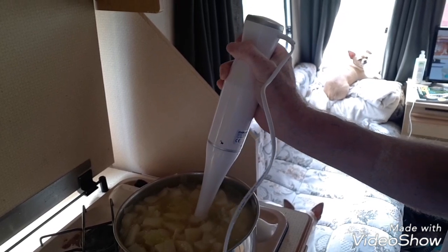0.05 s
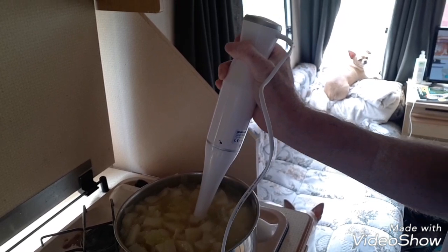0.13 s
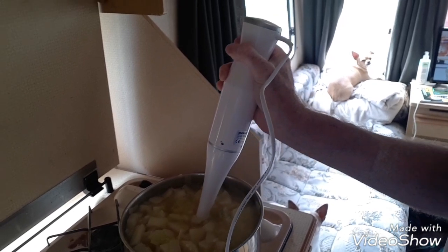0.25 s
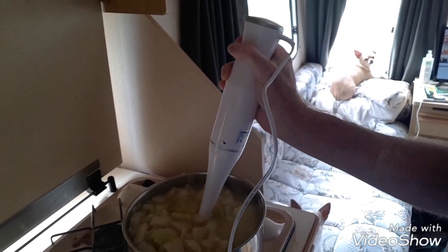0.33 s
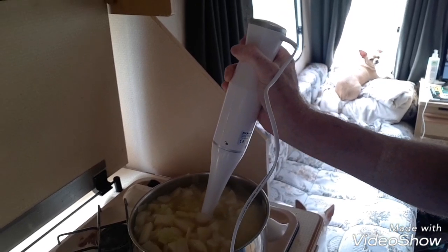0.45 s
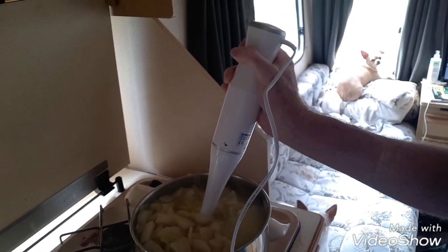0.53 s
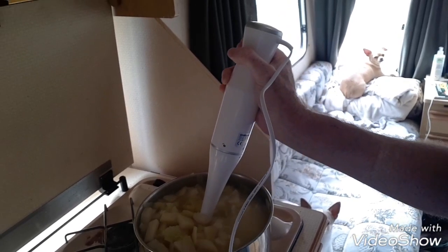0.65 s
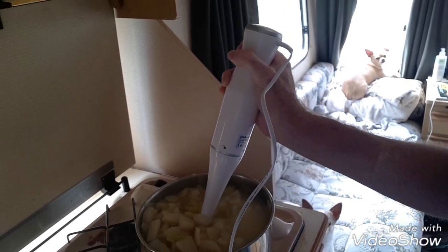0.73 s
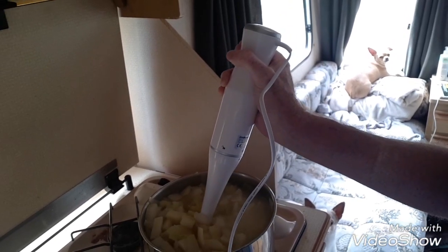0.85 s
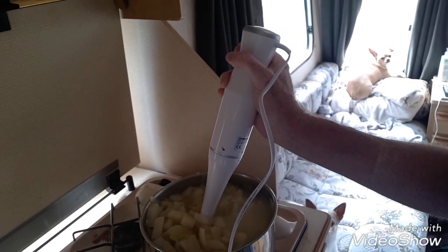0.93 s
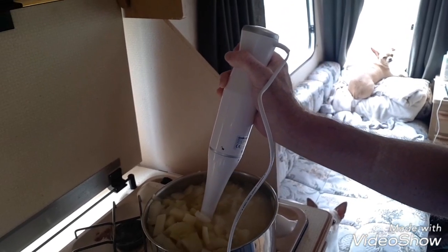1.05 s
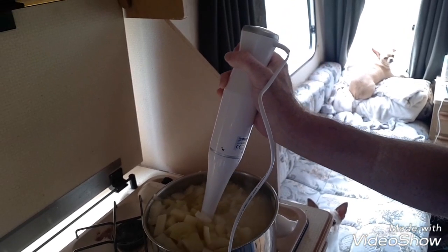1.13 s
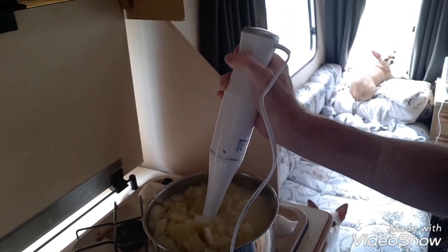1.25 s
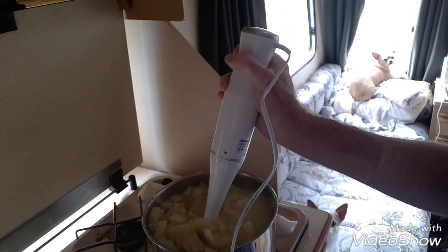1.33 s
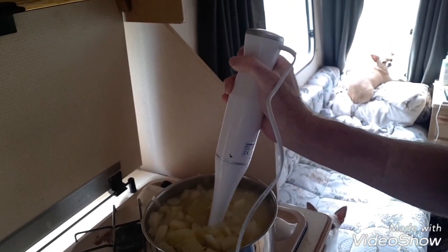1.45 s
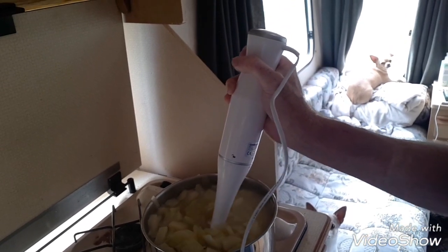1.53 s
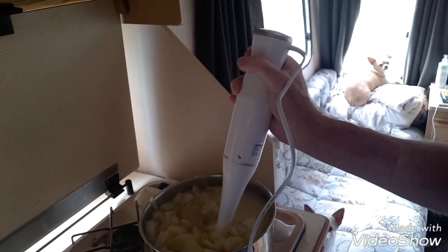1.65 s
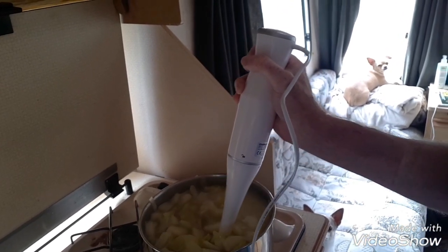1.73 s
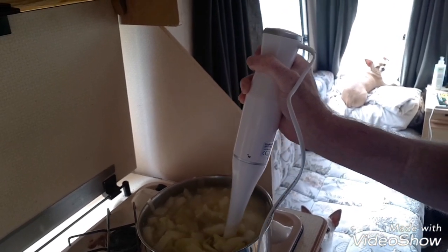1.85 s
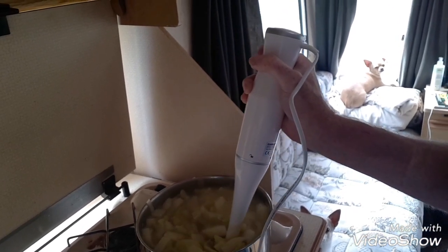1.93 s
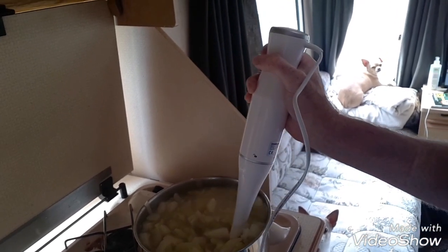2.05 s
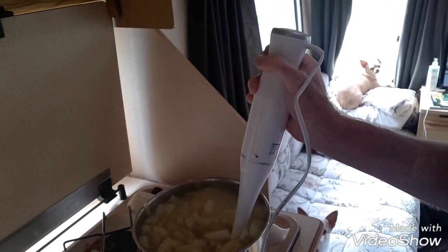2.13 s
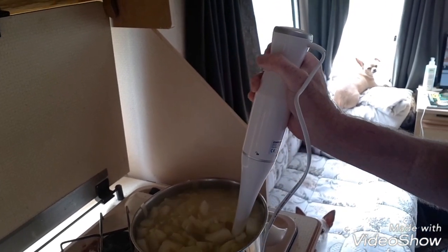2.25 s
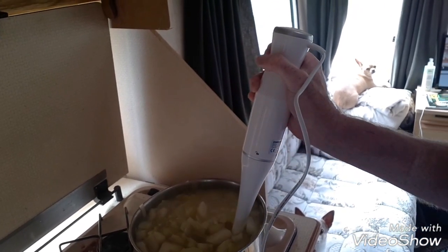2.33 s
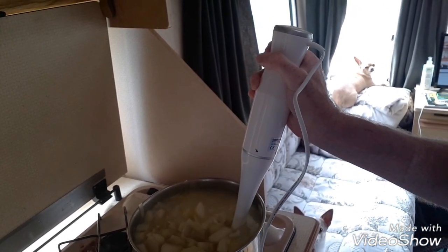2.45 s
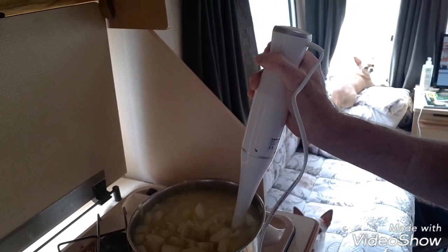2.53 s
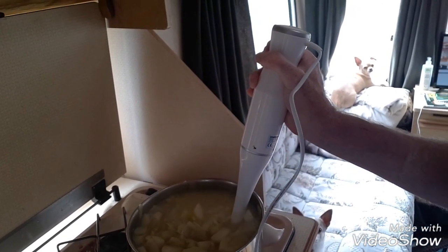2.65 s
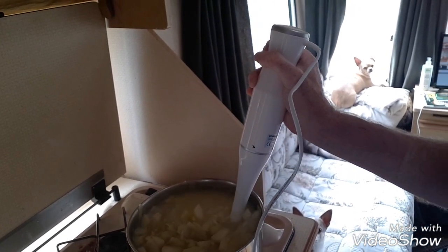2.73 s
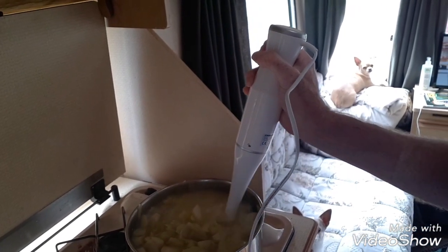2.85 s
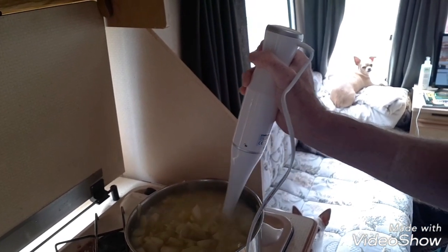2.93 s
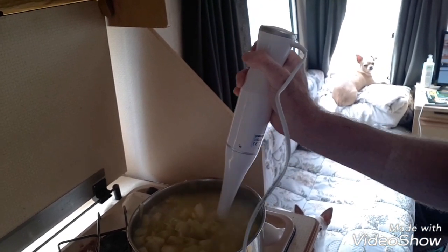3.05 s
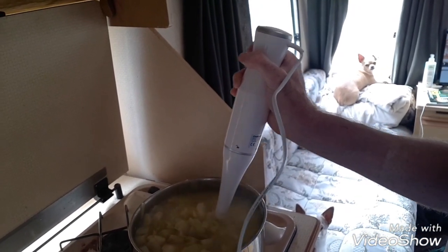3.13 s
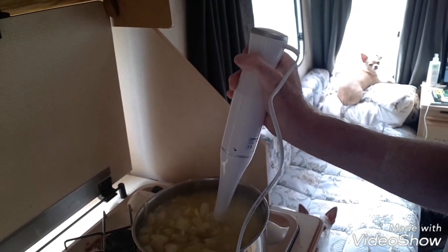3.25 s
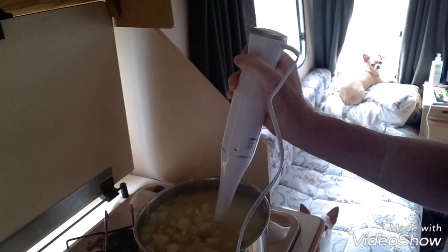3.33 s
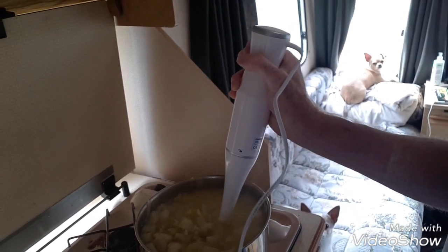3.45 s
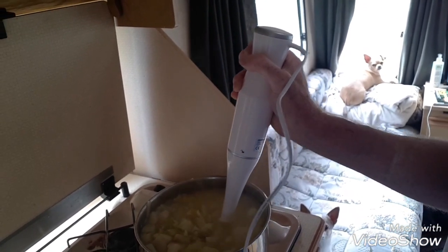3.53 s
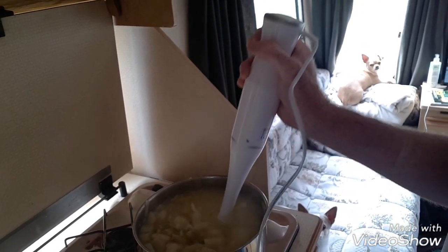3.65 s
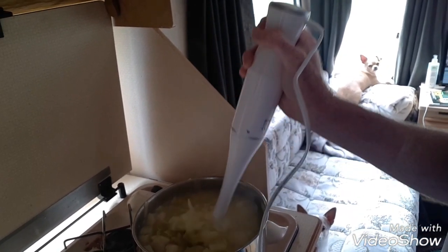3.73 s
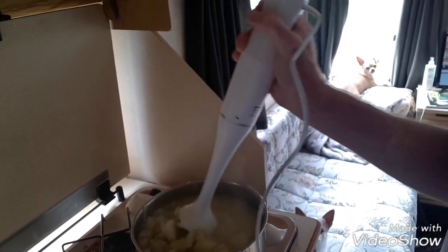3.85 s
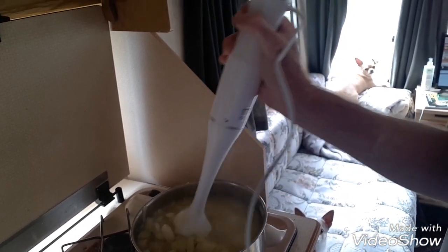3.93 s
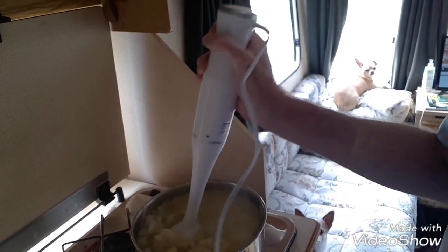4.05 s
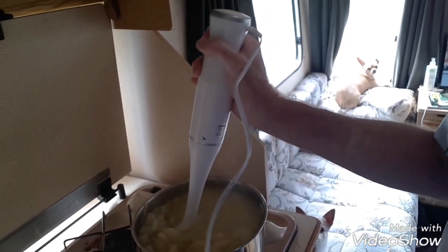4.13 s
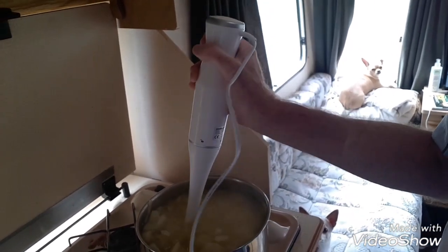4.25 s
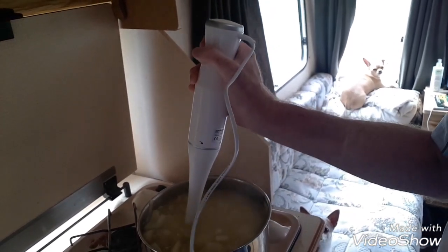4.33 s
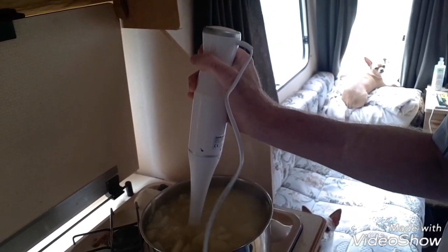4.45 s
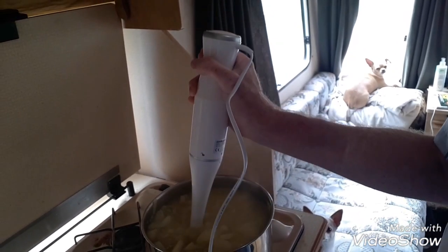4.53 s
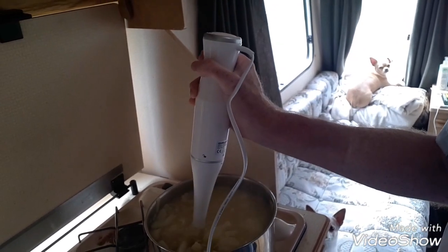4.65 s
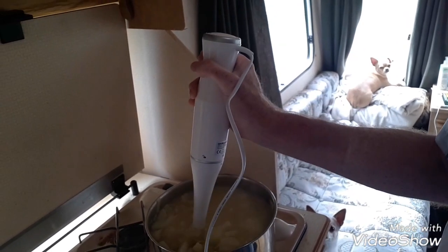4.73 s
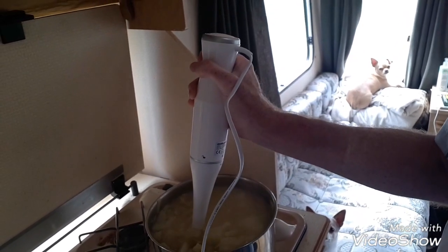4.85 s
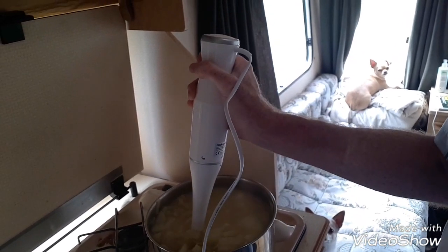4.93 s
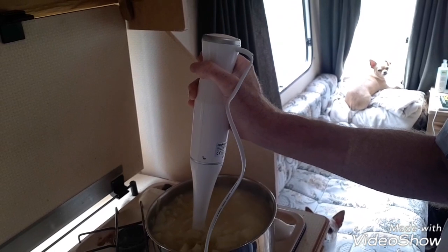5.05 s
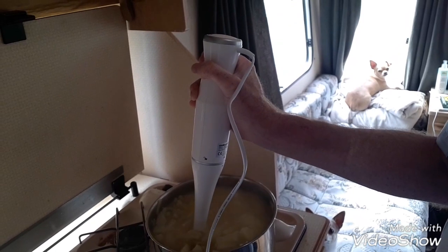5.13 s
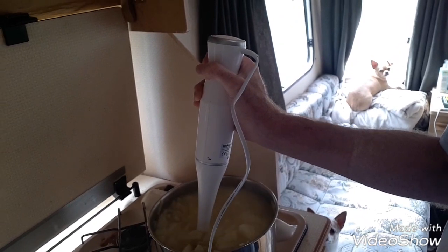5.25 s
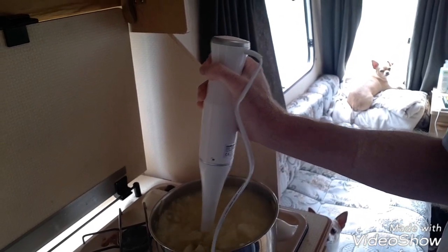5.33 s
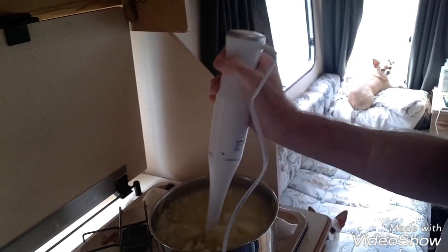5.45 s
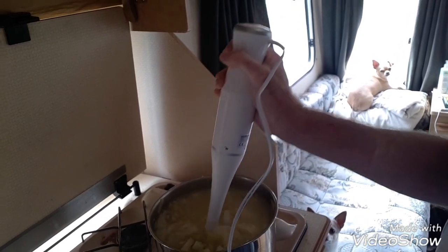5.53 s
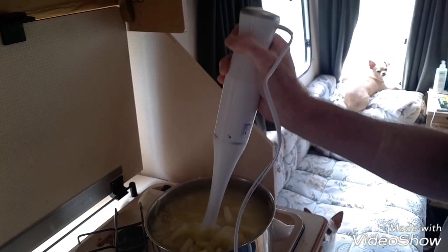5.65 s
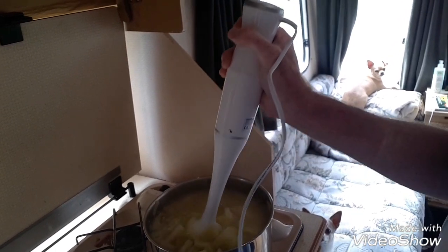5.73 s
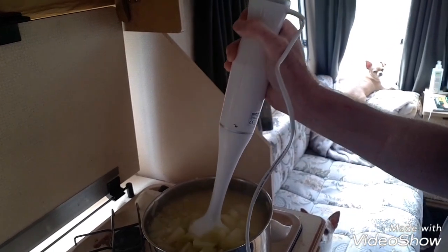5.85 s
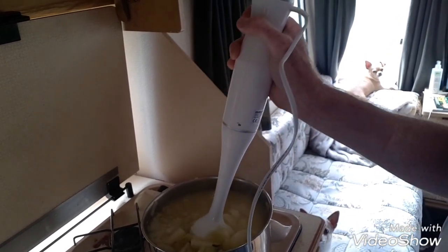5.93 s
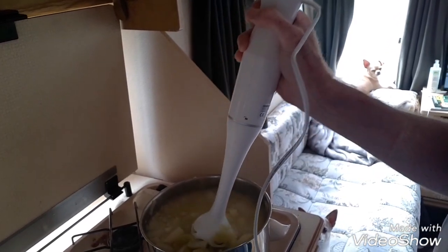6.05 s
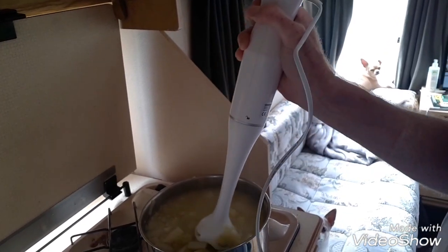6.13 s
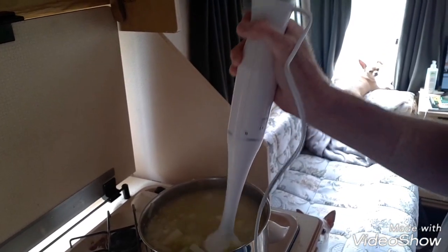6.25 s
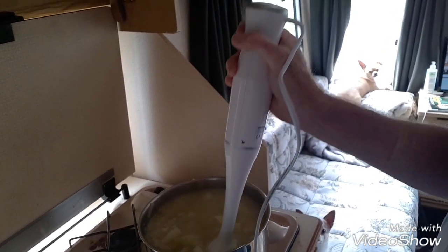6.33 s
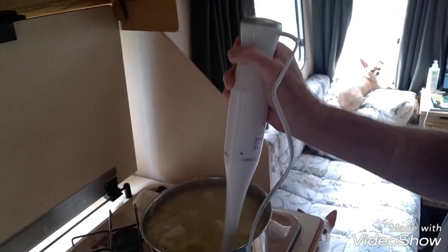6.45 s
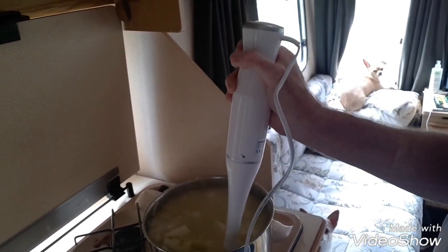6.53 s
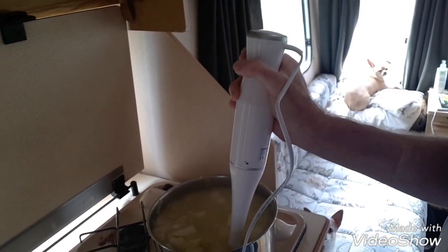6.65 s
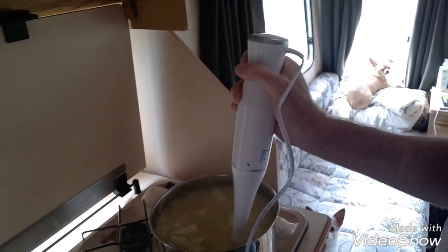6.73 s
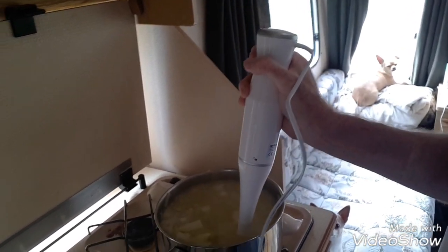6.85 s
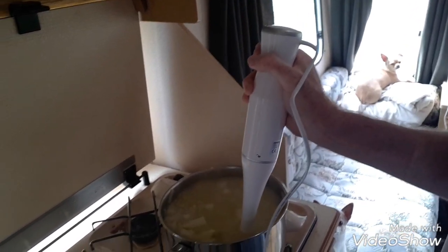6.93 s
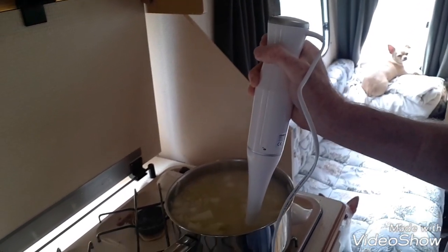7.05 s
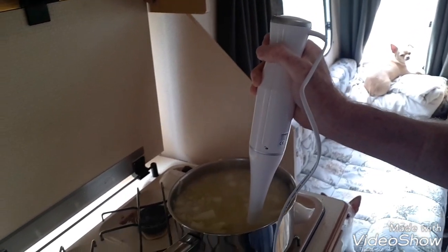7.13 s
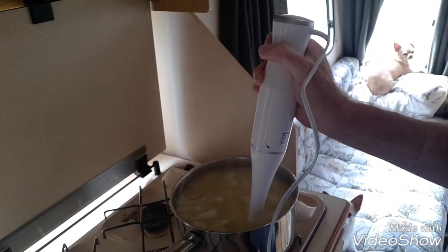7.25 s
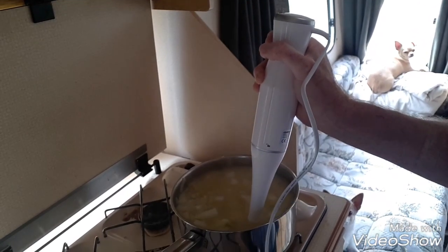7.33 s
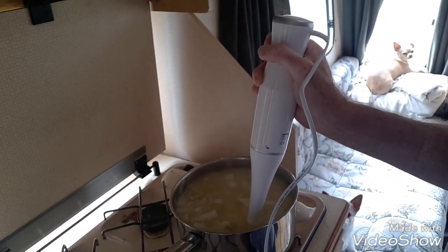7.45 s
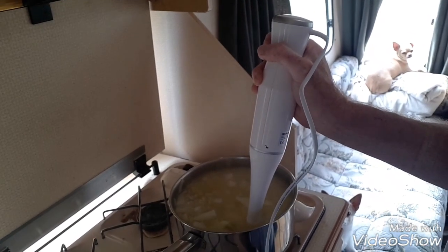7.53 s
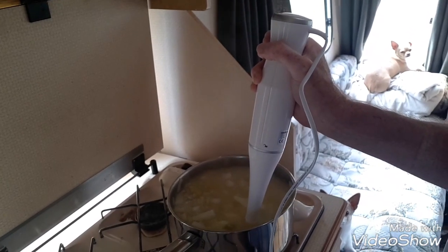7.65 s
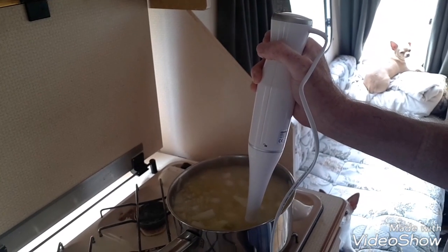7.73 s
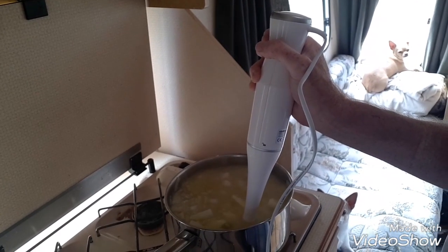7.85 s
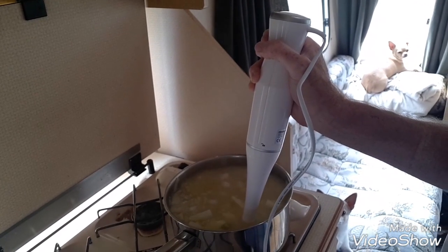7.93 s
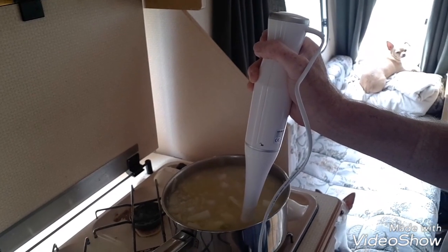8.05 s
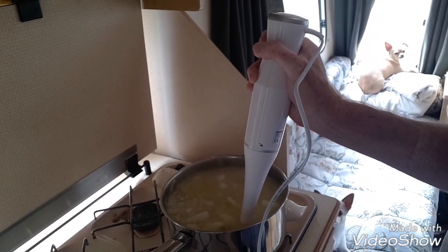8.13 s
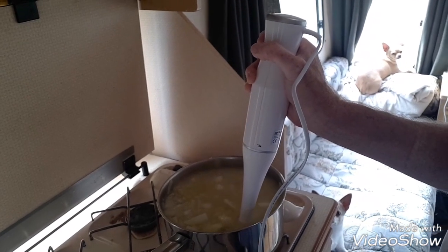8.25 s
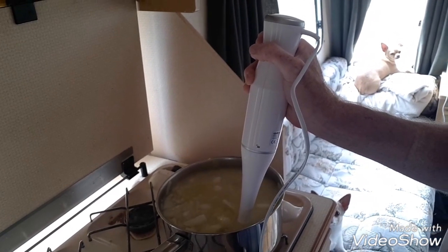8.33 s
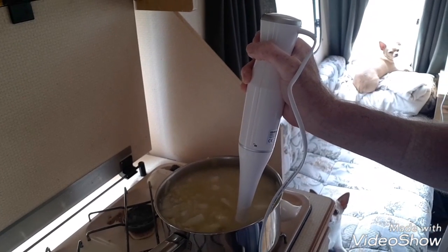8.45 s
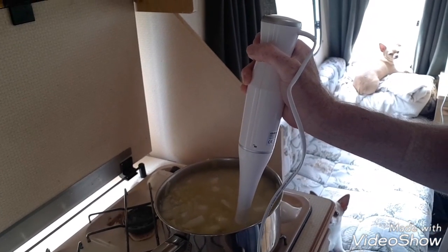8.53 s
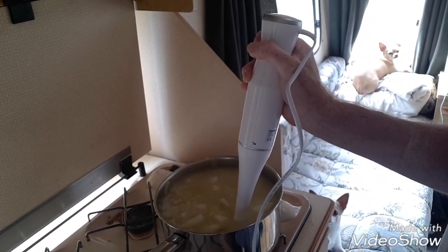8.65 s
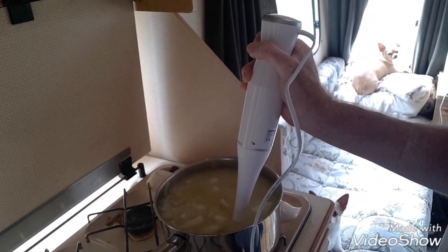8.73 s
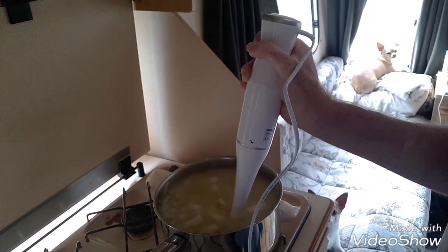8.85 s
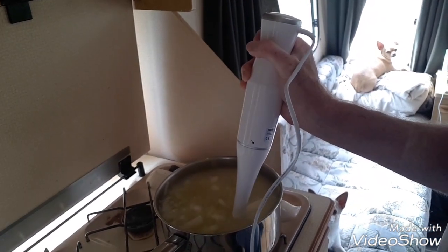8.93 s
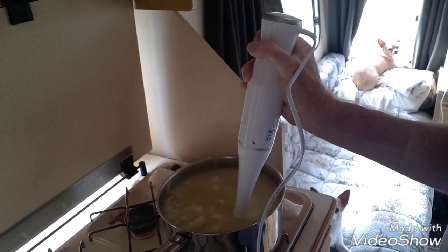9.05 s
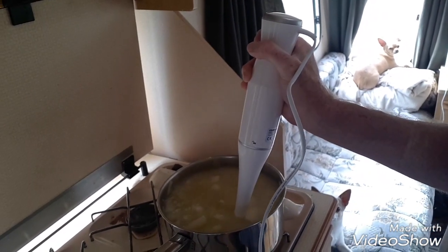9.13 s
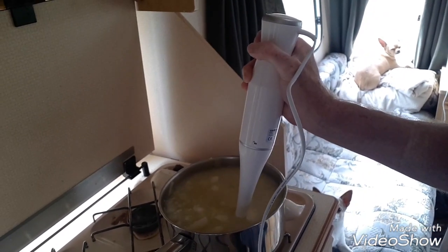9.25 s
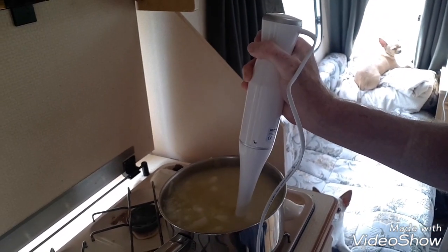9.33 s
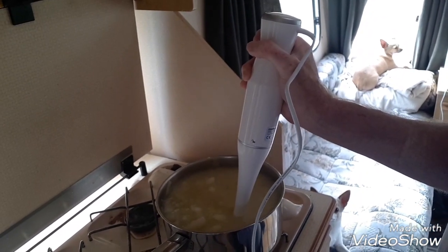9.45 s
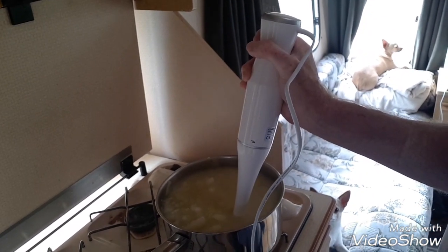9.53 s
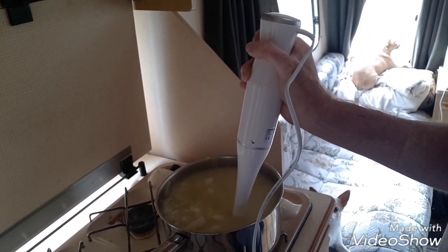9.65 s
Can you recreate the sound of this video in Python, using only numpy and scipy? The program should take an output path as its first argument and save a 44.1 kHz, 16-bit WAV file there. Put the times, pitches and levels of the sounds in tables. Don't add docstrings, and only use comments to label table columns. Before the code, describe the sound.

A hand blender purees soup in a steel pan in pulses and long runs, humming, whining and sloshing, with a faint dog whimper in one pause.

```python
import sys
import numpy as np
from scipy import signal
from scipy.fft import rfft, irfft, next_fast_len
from scipy.io import wavfile

SR = 44100
rng = np.random.default_rng(int(sys.argv[2]) if len(sys.argv) > 2 else 0)


def master(y):
    cut = np.clip(np.atleast_2d(y).T, -1, 1)
    pcm = np.round(cut * 32767)
    wavfile.write(sys.argv[1], SR, pcm.astype(np.int16))


def field_ratio(decibels):
    return 10 ** (np.asarray(decibels, dtype=float) / 20)


N = 427329
TIME = np.arange(N) / SR
COARSE = TIME[::50]
PADDED = next_fast_len(N)
FREQ = np.arange(PADDED // 2 + 1) * SR / PADDED + 1e-3
MAINS_RIPPLE_HZ = 100


def rms_one(x):
    return x / np.sqrt(np.mean(x ** 2) + 1e-20)


def in_time(rows):
    s, *columns = np.transpose(rows)
    return [np.interp(TIME, s, c) for c in columns]


def at_hz(points):
    hz, values = np.transpose(points)
    return np.interp(np.log(FREQ), np.log(hz), values)


def modes(rows):
    return np.sqrt(sum(field_ratio(db) ** 2 / (1 + (2 * (FREQ - hz) / width) ** 2) ** 2 for hz, width, db in rows))


def drift(rate):
    r = np.exp(-80 * np.pi * rate / SR)
    slow = signal.lfilter([1], [1, -2 * r, r * r], rng.standard_normal(N // 40 + 2002))[2000:]
    return np.interp(np.arange(N) / 40, np.arange(len(slow)), rms_one(slow))


# pitch_hz, likeness (-1 to 1)
LIKENESS = [(30, 0), (100, 0.72), (330, .85), (700, 0.43), (1500, 0.34), (3000, -.1)]


def noise(gain, band_hz=(20, 20000), grain_db=0.):
    lumps = field_ratio(grain_db * drift(60.))
    mid, side = rfft(rng.standard_normal((2, N)) * lumps, PADDED) * gain
    alike = np.clip(at_hz(LIKENESS), -1, 1)
    pair = np.sqrt(1 + alike) * mid + np.sqrt(1 - alike) * side * [[1], [-1]]
    inside = (FREQ > band_hz[0]) & (FREQ < band_hz[1])
    return rms_one(irfft(pair, PADDED)[:, :N]) * np.sqrt(np.sum(gain ** 2) / np.sum(gain[inside] ** 2))


def walls(x, t60, wet_db):
    t = np.arange(int(.2 * SR)) / SR
    tail = rng.standard_normal((2, len(t))) * field_ratio(-60 * t / t60) * (t > .002)
    tail = field_ratio(wet_db) * tail / np.sqrt(np.sum(tail ** 2, axis=1, keepdims=True))
    return (x + signal.fftconvolve(x[None], tail, axes=1)[:, :N]) / np.sqrt(1 + field_ratio(wet_db) ** 2)


# pitch_hz, level_db (per Hz)
ROOM = [(20, -30), (50, -13), (95, -2), (200, -13), (370, -17.5), (950, -19.5), (1150, -23.5), (5600, -38),
        (7800, -27), (9400, -48.5), (15000, -52.5)]


def room_air():
    return field_ratio(-68.5) * noise(field_ratio(at_hz(ROOM)))


# start_s, pitch_hz, level_db
WHIMPER = [
    (3.84, 2400, -100),
    (3.87, 2360, -90),
    (3.95, 2260, -80.5),
    (4.07, 2130, -75),
    (4.11, 2170, -100),
]


def dog():
    hz, db = in_time(WHIMPER)
    tone = field_ratio(db) * (db > -99) * np.sin(2 * np.pi * np.cumsum(hz) / SR)
    return walls(tone, t60=.2, wet_db=-10.5)


def burst(at_s, peak_db, t60, source):
    since = np.arange(int(.25 * SR)) / SR
    start = round(at_s * SR)
    return start, field_ratio(peak_db - 6 - 60 * since / t60) * source[:, start:start + len(since)]


# start_s, level_db (peak), pitch_hz, decay_s
TOUCHES = [(0.656, -44, 1090, .03), (3.1, -36.5, 1500, .04), (3.9, -69.5, 3100, 0.033),
           (3.955, -49, 2900, 0.16), (4.135, -63, 3800, 0.038), (4.228, -52.5, 1500, 0.33),
           (4.294, -44, 1000, 0.043), (6.098, -65, 500, 0.066), (6.305, -44, 800, 0.1),
           (6.33, -47, 450, 0.38), (6.435, -40, 1007, 0.039)]


def touches():
    out = np.zeros((2, N))
    white = rng.standard_normal((2, N))
    for s, db, hz, t60 in TOUCHES:
        start, x = burst(s, db + 12.5, t60, white)
        band = signal.butter(1, [0.67 * hz, 1.0 * hz], "band", fs=SR)
        out[:, start:start + x.shape[1]] += signal.lfilter(*band, x)
    return out


# start_s, level_db (peak), thud_db (gain of the thud against the crack)
LUMPS = [(0.1326, -24.5, -6), (0.2124, -24.5, -8), (0.2698, -24, -10), (1.8088, -31, 1), (3.4994, -62, 19),
         (5.2994, -44, 8), (5.3694, -52, -3.5), (7.8744, -33, 8), (7.9174, -35, 0), (8.1644, -38.5, -10),
         (9.3794, -30, 3)]


def lumps_on_blade():
    out = np.zeros((2, N))
    crack = noise(modes([(3470, 2800, 0.83), (7900, 2000, -2.8)]))
    thud = noise(modes([(700, 1000, 0)]))
    for s, db, thud_db in LUMPS:
        start, x = burst(s, db + 4.5, 0.15, crack + field_ratio(thud_db) * thud)
        out[:, start:start + x.shape[1]] += x
    return out


# start_s (switched on), still_s (all at rest)
RUNS = [
    (-1, .656),
    (.657, 3.79),
    (4.293, 5.66),
    (6.434, 10),
]


def running():
    gates = [np.clip(np.minimum((TIME - on) / .003, (still - TIME) / .1), 0, 1) for on, still in RUNS]
    return np.max(gates, axis=0)


# start_s (pressed), release_s
PRESSES = [
    (-1, -.16),
    (.06, .3),
    (.657, .868),
    (1.036, 2.905),
    (3.076, 3.435),
    (4.294, 5.265),
    (6.435, 11),
]


def follow(start_db, rise_s, run_on_s, fall_db):
    each = []
    for on, off in PRESSES:
        swell = start_db * np.exp(-np.maximum(COARSE - on, 0) / rise_s) - 90 * (COARSE < on)
        each.append(swell - fall_db * np.maximum(COARSE - off - run_on_s, 0))
    return np.interp(TIME, COARSE, np.max(each, axis=0))


# start_s, turns_hz
LOADED = [(.8, 197), (1.2, 201), (1.68, 204), (1.8, 194.5), (1.92, 200), (2.28, 201.5), (2.5, 197),
          (2.9, 194.5), (3.35, 198), (4.4, 185), (4.56, 184), (4.68, 196), (5.22, 200.5), (6.6, 195),
          (7.77, 204), (8.81, 202), (9.2, 195.5), (9.69, 201.5)]


def rotation():
    spin_up_s, coast_s = .026, .18
    share, left = 0, 1
    for (on, off), (again, _) in zip(PRESSES, PRESSES[1:] + [(12, 12)]):
        reached = 1 - (1 - left) * np.exp(-np.clip(COARSE - on, 0, off - on) / spin_up_s)
        share = np.where(COARSE >= on, reached * np.exp(-np.maximum(COARSE - off, 0) / coast_s), share)
        left = np.exp(-(again - off) / coast_s)
    return np.interp(TIME, COARSE, share) * in_time(LOADED)[0]


def ripple(depth):
    turn = 2 * np.pi * MAINS_RIPPLE_HZ * TIME
    return 1 + depth * (np.cos(turn) + .7 * np.cos(2 * turn + 1.2) + .45 * np.cos(3 * turn + 2.2))


# start_s, swirl_db (soup), pressed_db (blade guard on the pan),
# froth_db, leaning_db (shaft)
HAND = [(.14, 0, -12, 8, 0), (.33, -3, -8, -1, 2), (.8, -3, 3, 0, -6), (1.37, -3, -1, 0, -3),
        (1.82, 3, 0, -1, 4), (2.15, 0, -1, 0, 6), (2.3, 3, 0, 0, 3), (2.88, 2, 3, 2, -4),
        (3.3, 1, 3, -2.5, -4), (4.31, -2, -12, 0, -5), (4.38, 1, 10, 2, -4), (4.65, 0, 1, 0, -6),
        (5.25, 0, -2, 0, 3), (6.6, -1, -1, -1, -5), (7.15, -5, -11, -2, 6), (7.6, -3, 1, -2, 7),
        (8.3, 0, -1, -1.5, 3), (9.69, 1, 0, -2, 5)]
# pitch_hz, width_hz, level_db
SLOSH = [(279.6, 51, -0.5), (349.5, 72, 3), (178, 53, -10)]


def slosh():
    swirl_db, _, _, leaning_db = in_time(HAND)
    slosh_db = -33 + swirl_db + 0.9 * drift(6.) + follow(-25, .028, .075, 155)
    rumble_db = slosh_db - 18 + 0.6 * leaning_db + 2.6 * drift(5.)
    rumble = field_ratio(rumble_db) * noise(modes([(101.8, 31, 0)]))
    return rumble + field_ratio(slosh_db) * noise(modes(SLOSH), (220, 370), grain_db=2.0)


# pitch_hz, level_db (per Hz)
CHURN = [(300, -23.5), (450, 2), (650, -1.5), (900, 3.5), (1050, -2), (1600, -1), (2000, -5), (2600, -9),
         (2950, -13.5), (4000, -38.5)]


def churn():
    swirl_db = in_time(HAND)[0]
    churn_db = -31.5 + .3 * swirl_db + 0.4 * drift(6.) + follow(-18, .02, .045, 172)
    return field_ratio(churn_db + 0.1) * noise(field_ratio(at_hz(CHURN)), (450, 2800), grain_db=1.5)


# pitch_hz, level_db (per Hz)
SPRAY = [(2000, -23.5), (3000, 0), (4500, 3), (6000, -0.5), (9000, -2.5), (11500, -2), (13500, -2.5),
         (14500, -8.5), (15500, -21)]
# pitch_hz, width_hz, level_db
HOUSING = [(7750, 1300, 7.5), (4800, 170, -10.5), (11600, 200, 1.5), (13700, 300, -23), (2620, 60, -23)]
# start_s, level_db
SURFACED = [(0, 1), (.12, 3), (.33, 5), (.42, 0.), (4.3, 4), (4.36, 9), (4.55, 1)]


def spray_and_brushes():
    froth_db = in_time(HAND)[2]
    hiss_db = -45.5 + froth_db + 0.6 * drift(6.) + follow(-4, .03, .13, 120)
    turns = np.maximum(rotation(), 110.)
    spray_db = hiss_db - 2.0 + in_time(SURFACED)[0] + 27.0 * np.log10(turns / 200)
    spray_db += 1.2 * drift(8.)
    spray = field_ratio(spray_db) * noise(field_ratio(at_hz(SPRAY)), (5200, 6800), grain_db=2.35)
    hiss = field_ratio(hiss_db + 2.0) * noise(modes(HOUSING), (7000, 8500), grain_db=2.04) * ripple(0.11)
    return spray + hiss


def shaft_hum(turns, angle):
    _, pressed_db, _, leaning_db = in_time(HAND)
    hum_db = follow(-30, .015, .06, 300) - .9 * np.maximum(142 - turns, 0)
    blade_db = -33 + pressed_db + hum_db
    over_db = -50 + leaning_db + 3.5 * drift(2.) + hum_db
    shaft_db = -52 + leaning_db + 2.5 * drift(2.) + hum_db
    hum = field_ratio(blade_db + 1.8 * drift(13.0)) * np.sin(2 * angle)
    hum += field_ratio(blade_db - 18 + 0.6 * pressed_db) * np.sin(3 * angle)
    hum += field_ratio(over_db + 2.5 * drift(19.0)) * np.sin(4 * angle + 1)
    hum += field_ratio(shaft_db + 2.5 * drift(6.5)) * np.sin(angle + 2)
    return walls(hum, t60=.15, wet_db=-20)


BARS = list(zip([13, 13, 25, 24, 47, 48, 49, 72], [-2.5, -11.5, -9.5, -3.0, -2.0, -3.0, -3.0, -14.]))


def commutator_whine(angle):
    froth_db = in_time(HAND)[2]
    whine_db = -42.5 - .6 * froth_db + follow(-12, .03, .05, 190)
    twist = 0.01 * np.sin(2 * np.pi * MAINS_RIPPLE_HZ * TIME + 2.3 * drift(3.))
    whine = 0
    for order, db in BARS:
        rough = 0.58 + 1.13 * drift(150.)
        whine = whine + field_ratio(db + 1.6 * drift(7.9)) * rough * np.sin(order * (angle + twist))
    return walls(field_ratio(whine_db - 5.5) * whine * ripple(0.34), t60=.12, wet_db=8)


def motor():
    turns = rotation()
    angle = 2 * np.pi * np.cumsum(turns * (1 + .003 * drift(12.))) / SR
    return np.sqrt(2) * (shaft_hum(turns, angle) + commutator_whine(angle))


def scene():
    blender = slosh() + churn() + spray_and_brushes() + motor()
    return room_air() + dog() + touches() + lumps_on_blade() + running() * blender


def roll_off(x):
    return signal.sosfilt(signal.butter(12, 15730, fs=SR, output="sos"), x)


def record(dry):
    deep_cut = signal.butter(2, 55., "high", fs=SR, output="sos")
    heard = signal.sosfilt(deep_cut, dry) * field_ratio(np.array([[.1], [-.1]]))
    return roll_off(heard)


dry = scene()
out = record(dry)
master(out)
```